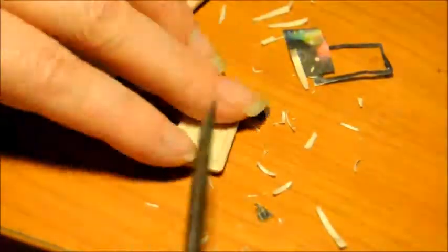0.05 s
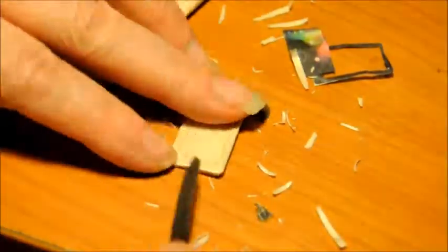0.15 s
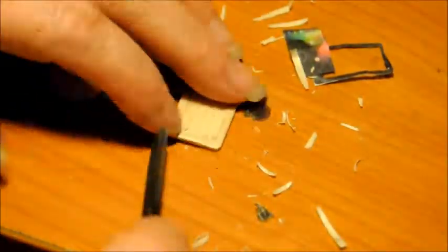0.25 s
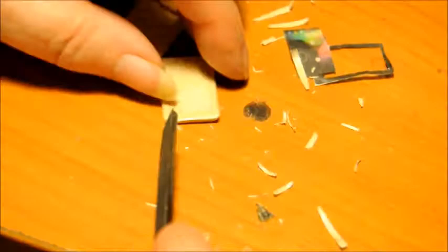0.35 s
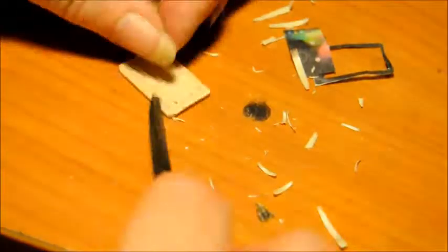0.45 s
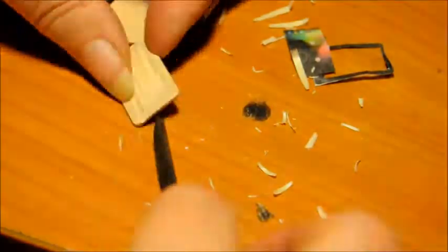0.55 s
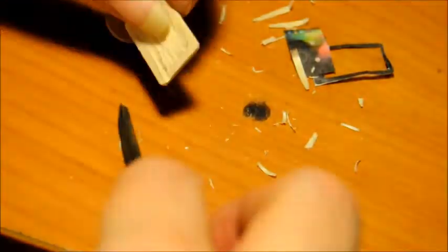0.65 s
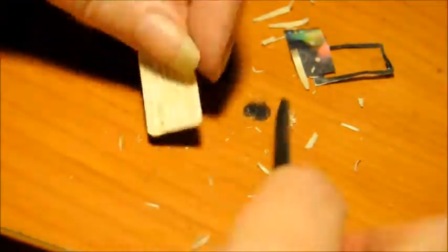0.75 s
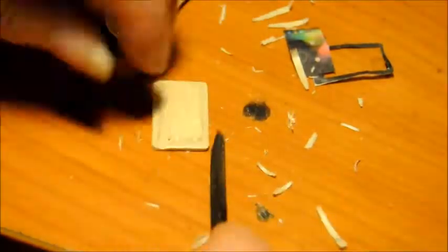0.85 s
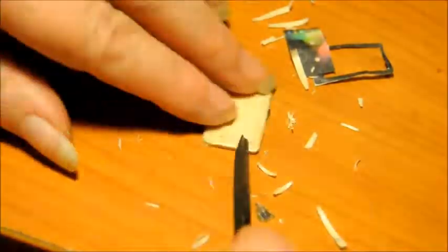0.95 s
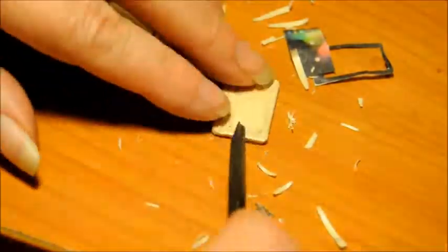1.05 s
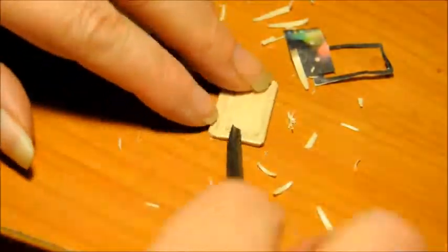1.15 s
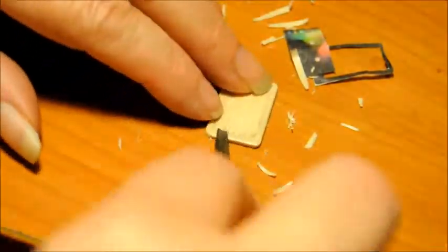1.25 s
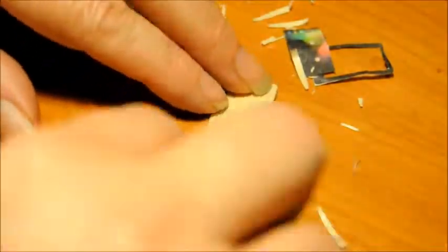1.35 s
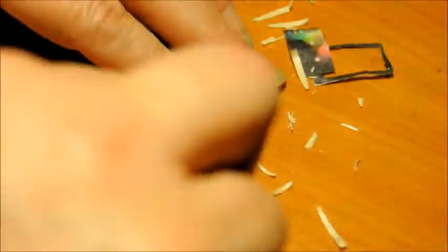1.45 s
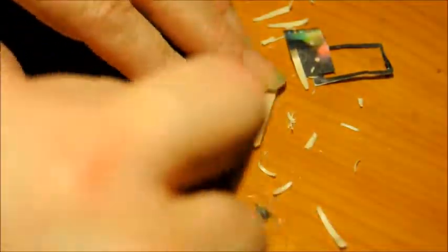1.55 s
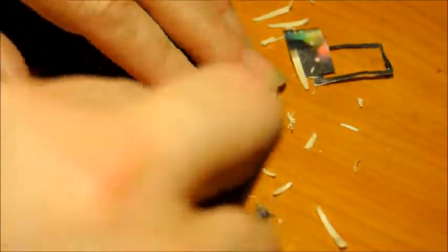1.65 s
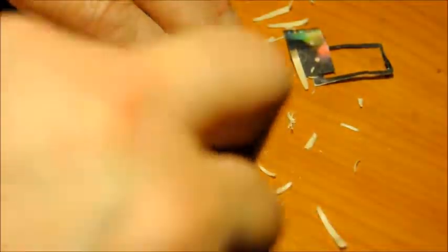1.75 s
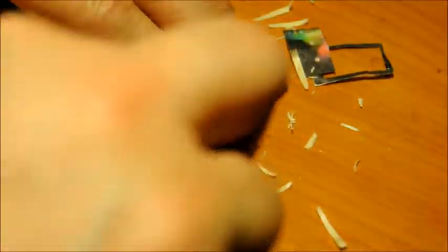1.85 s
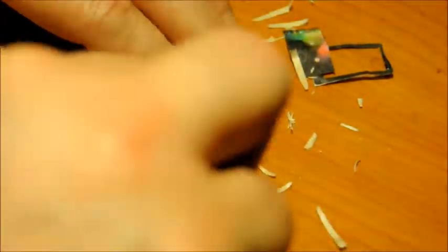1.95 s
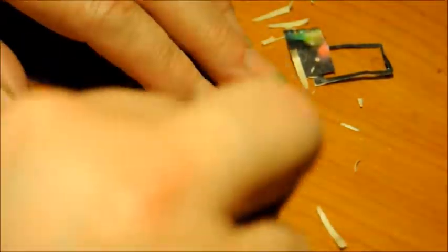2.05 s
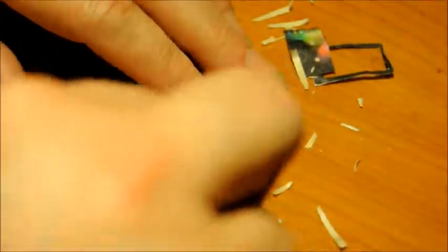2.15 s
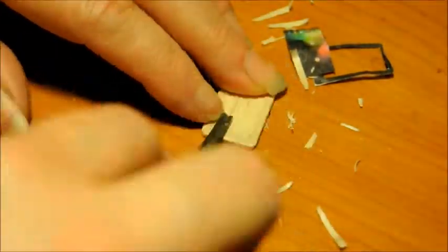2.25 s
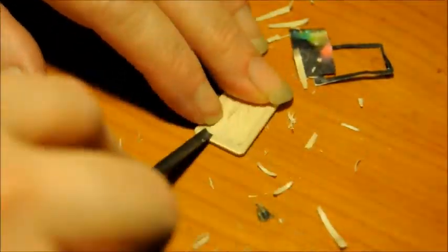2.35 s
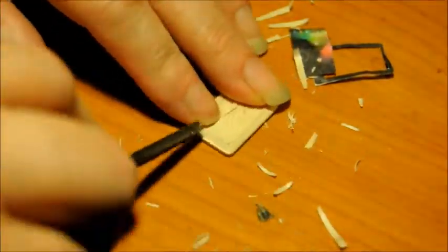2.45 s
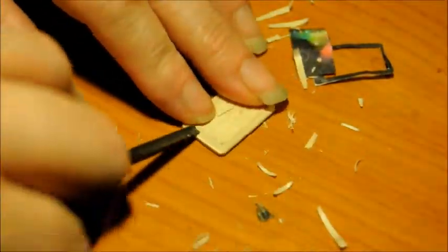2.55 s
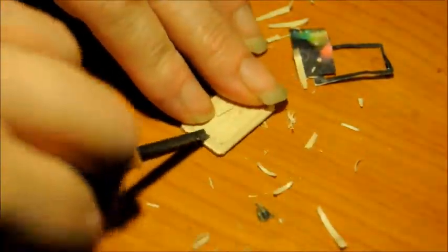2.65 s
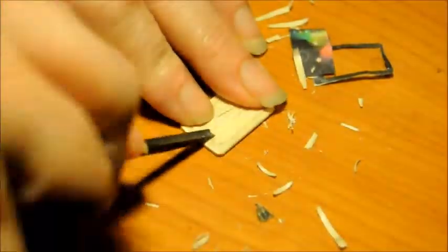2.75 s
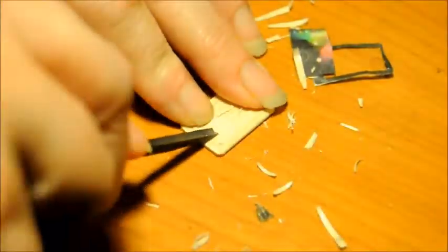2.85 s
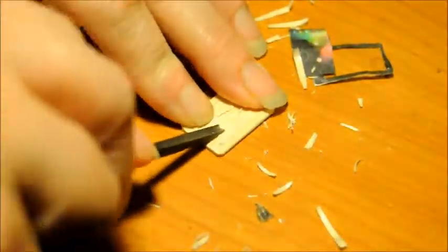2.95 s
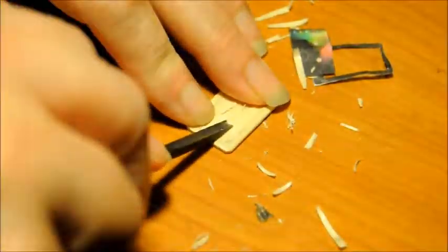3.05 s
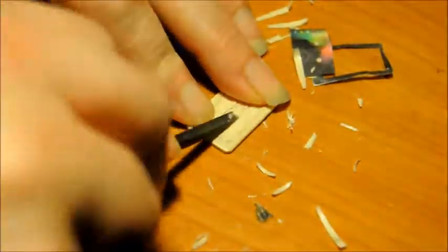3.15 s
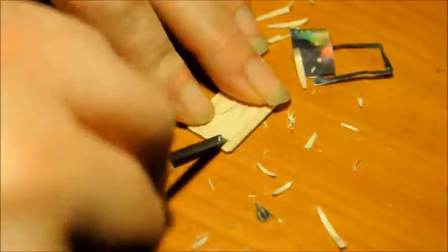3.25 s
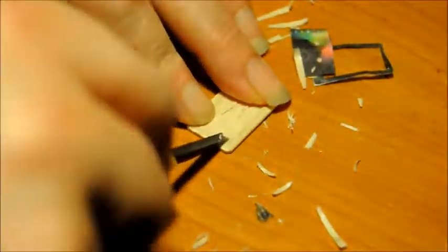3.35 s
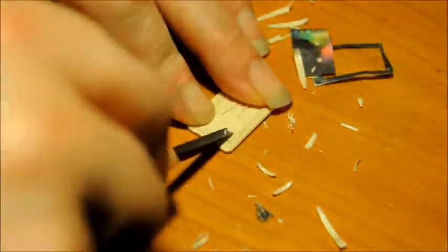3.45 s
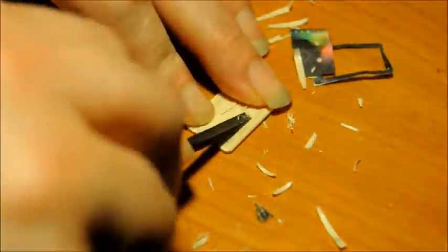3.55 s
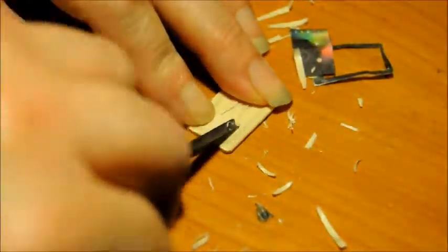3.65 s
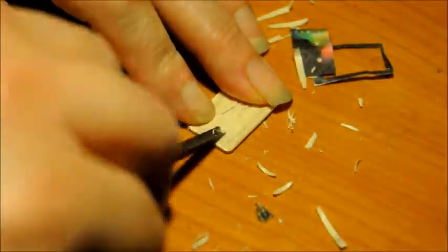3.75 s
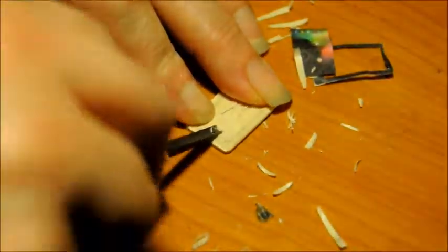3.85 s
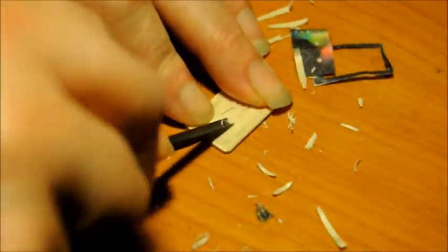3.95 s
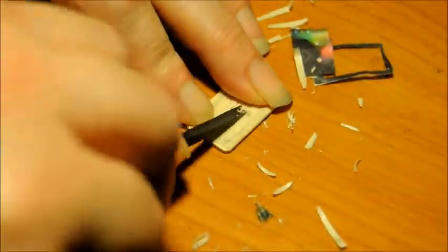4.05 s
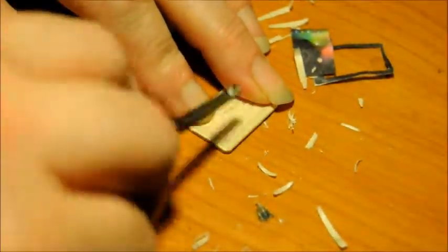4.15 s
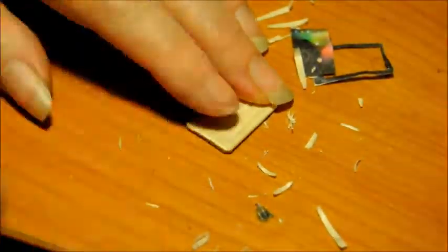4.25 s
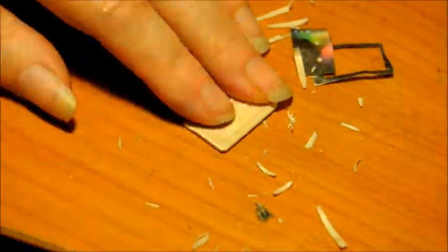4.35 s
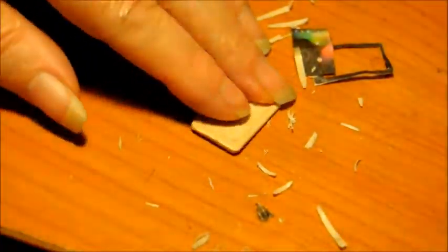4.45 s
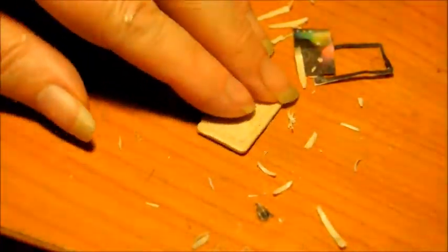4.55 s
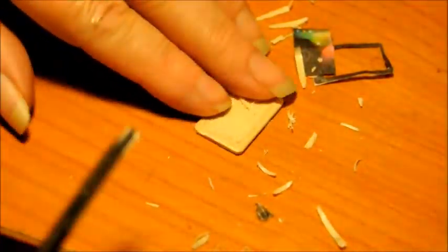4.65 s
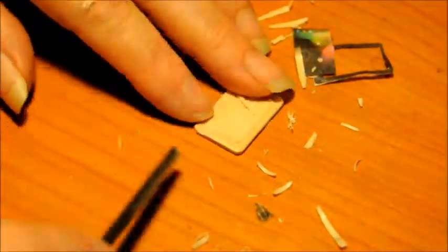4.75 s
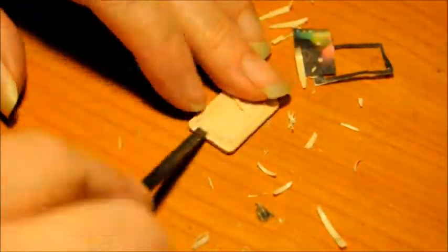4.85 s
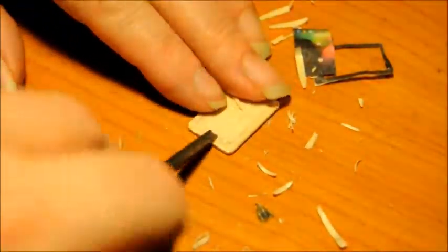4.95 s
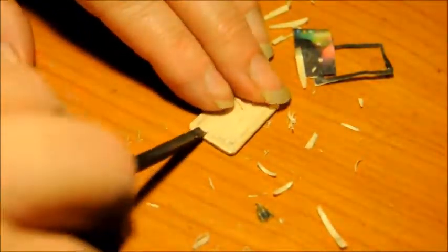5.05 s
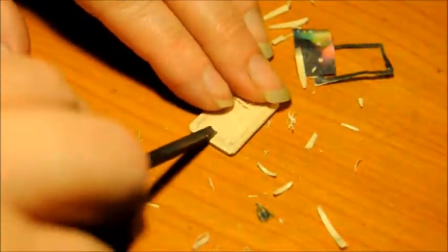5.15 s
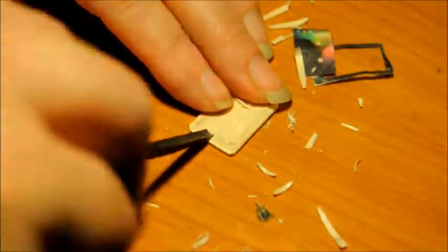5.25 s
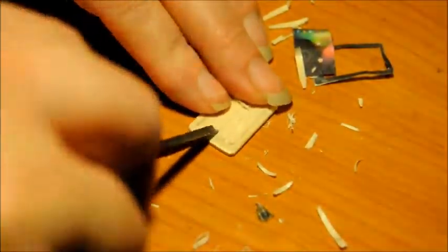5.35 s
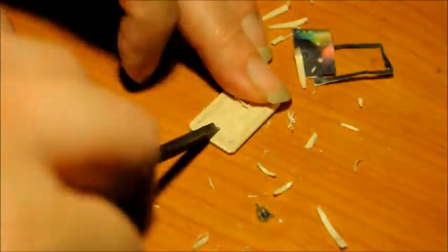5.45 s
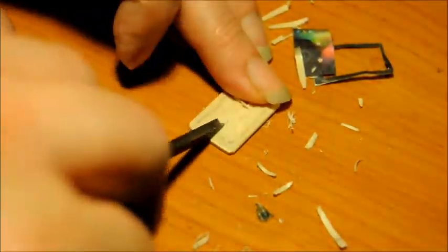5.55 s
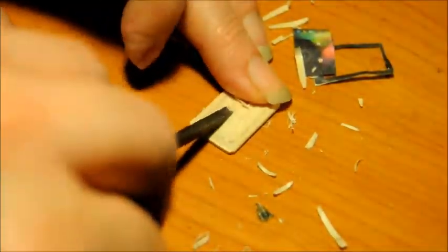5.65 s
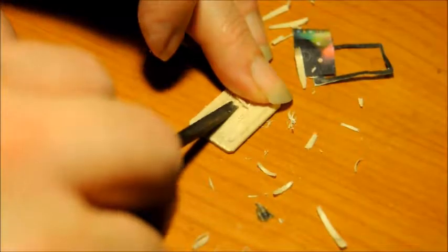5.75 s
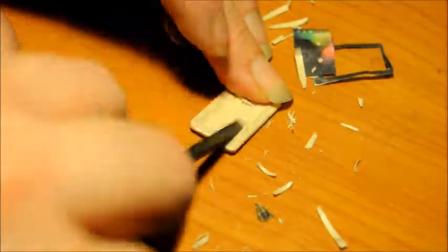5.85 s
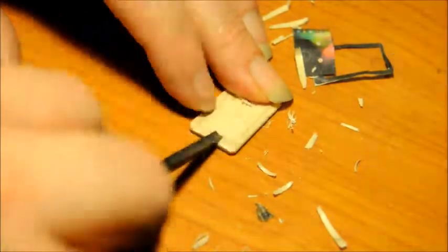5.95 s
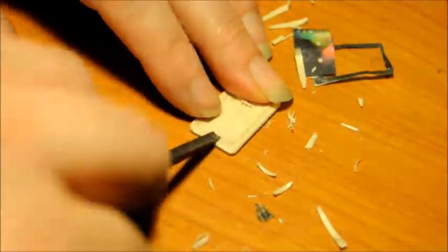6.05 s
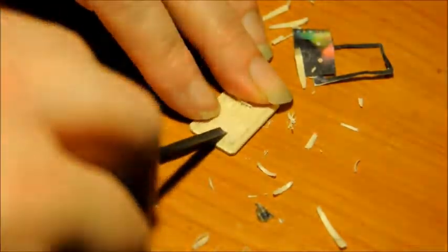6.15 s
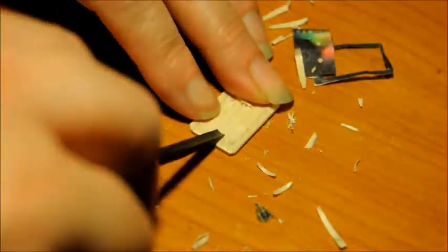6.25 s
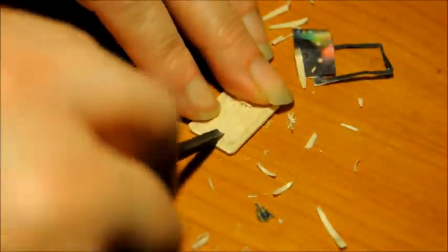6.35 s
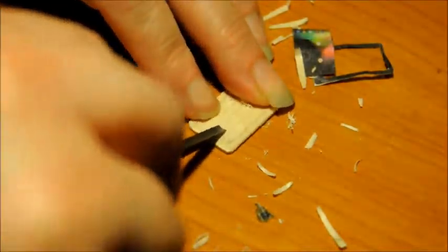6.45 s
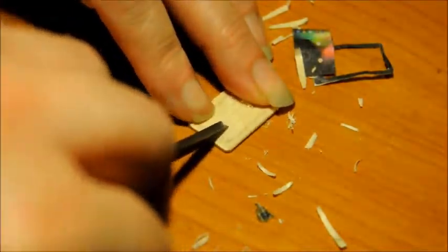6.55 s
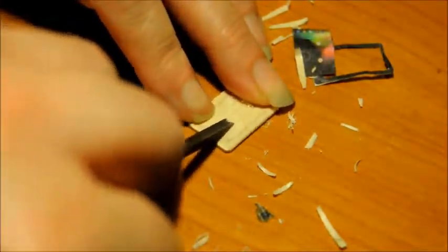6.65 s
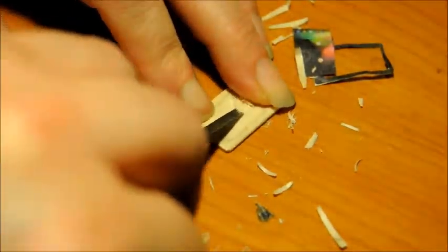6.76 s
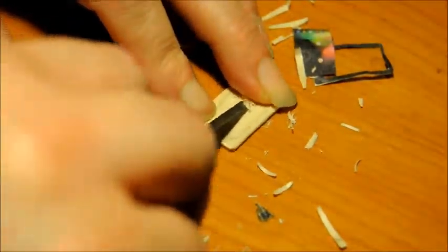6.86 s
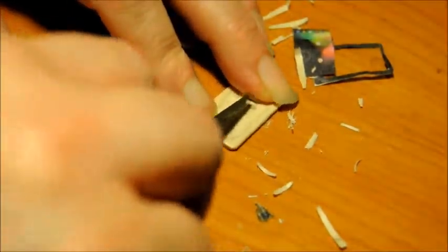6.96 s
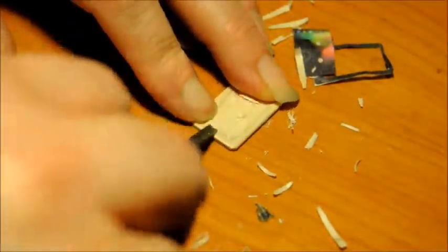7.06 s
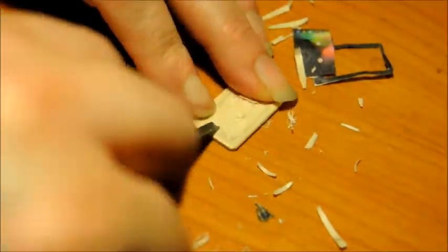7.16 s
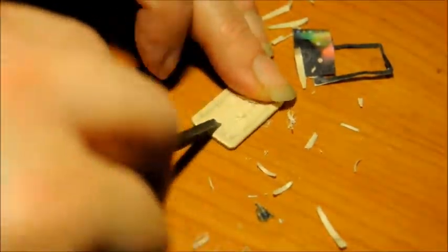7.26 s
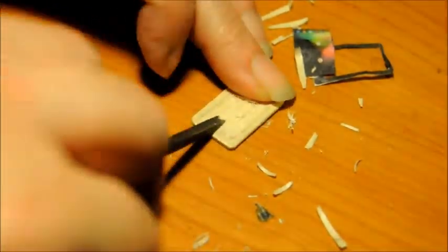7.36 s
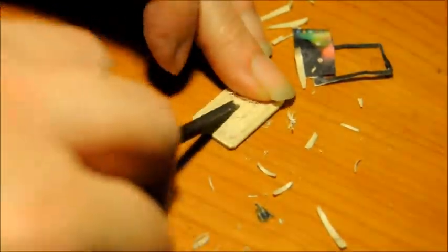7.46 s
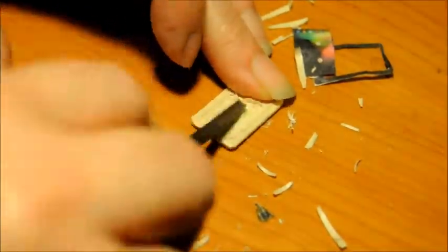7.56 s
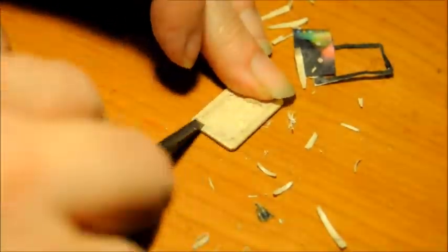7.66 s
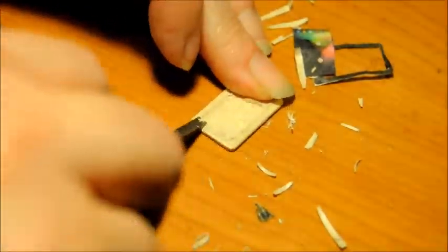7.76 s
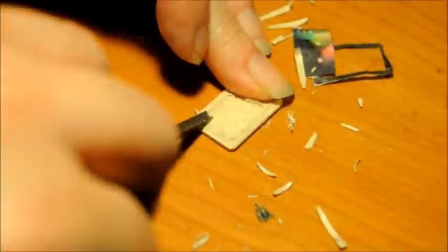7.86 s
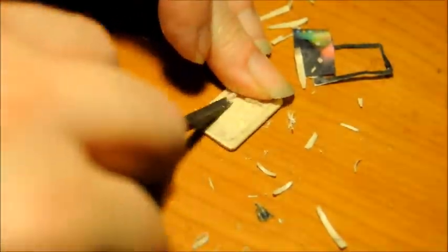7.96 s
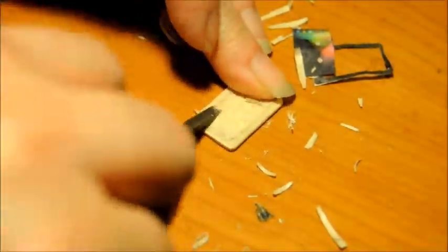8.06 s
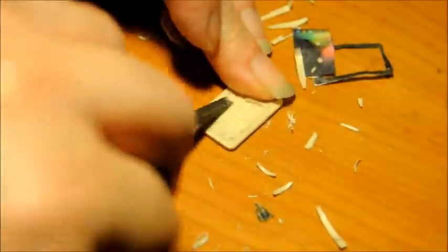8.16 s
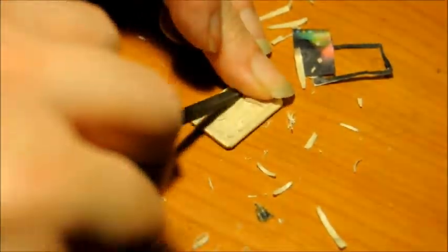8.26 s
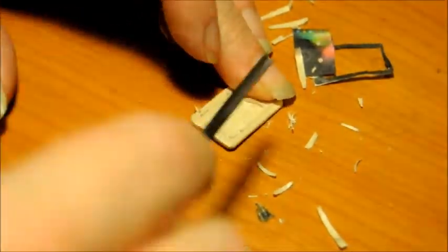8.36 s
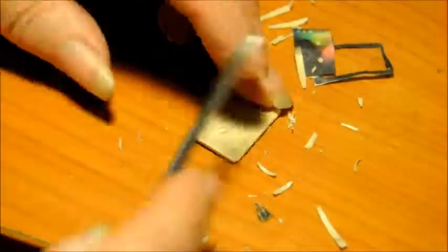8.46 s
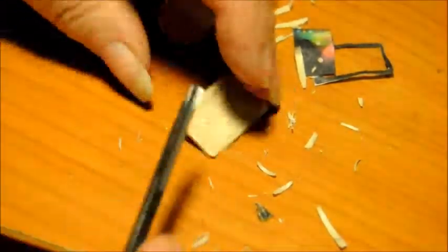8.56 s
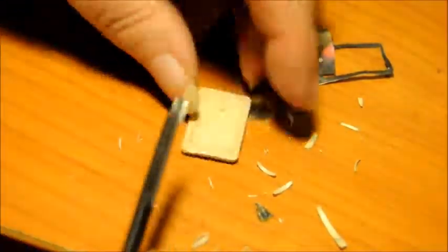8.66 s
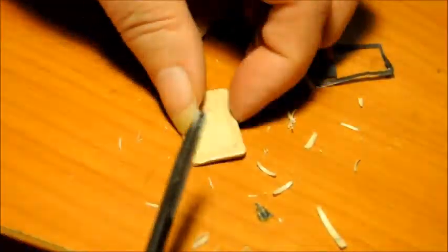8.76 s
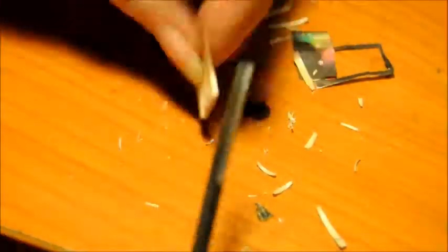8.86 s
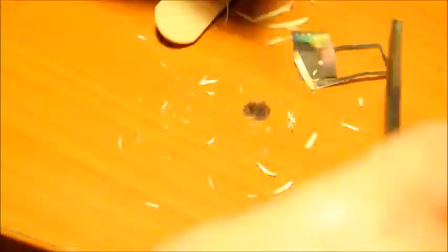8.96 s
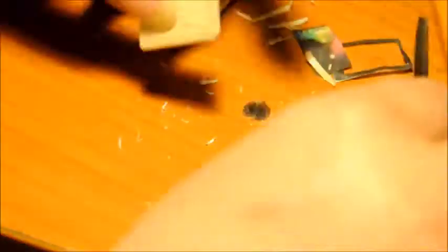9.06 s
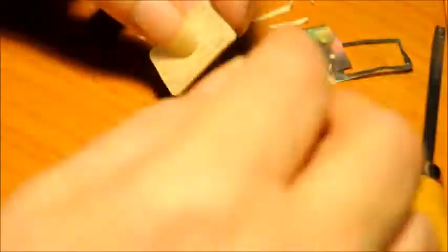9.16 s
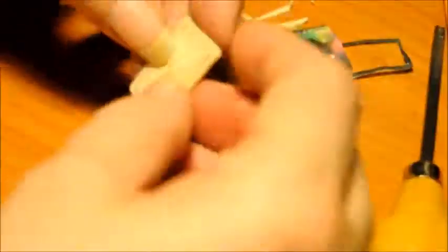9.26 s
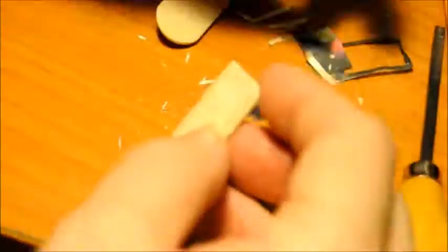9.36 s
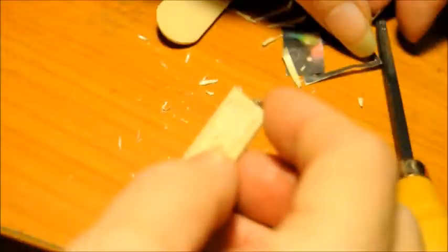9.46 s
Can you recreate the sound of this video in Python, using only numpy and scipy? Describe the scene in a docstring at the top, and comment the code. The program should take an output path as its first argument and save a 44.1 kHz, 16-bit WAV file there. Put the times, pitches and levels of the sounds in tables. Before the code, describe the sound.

A small steel carving tool works a thin slip of wood on a table, very close to the microphone. A faint, steady appliance hum and hiss run underneath. For the first 1.5 seconds the slip slides and taps lightly, with a cluster of small clicks and soft scrapes, strongest around 1 second. Two sharp clicks with a woody knock stand out at about 2.3 and 2.5 seconds. Sparse light ticks follow. From 4 to 9 seconds the blade makes short, quiet, gritty shaving strokes among small nicks and taps, and fibres snap crisply near 4.8, 6.6 and 6.8 seconds, then in a little flurry just before 9. A knock comes at 9 seconds. At about 9.2 the tool drops on the table with a bright, ringing clatter, the loudest moment, and quickly rattles to rest, leaving one tiny tick and the hum.

```python
"""Soft scrapes and sharp little ticks, very close: a small steel blade shaves and nicks a thin slip of wood.
Fibres catch, let go and snap under the edge. The slip slides and taps on a table; each contact
cracks, rings and knocks the table top. Near the end the tool is dropped and rattles to rest.
Behind it all, an appliance hums in the room over the microphone's own hiss."""
import sys
import numpy as np
from scipy.fft import rfft, irfft, next_fast_len
from scipy.io import wavfile
from scipy.ndimage import map_coordinates

SR = 44100
rng = np.random.default_rng(int(sys.argv[2]) if len(sys.argv) > 2 else 0)


def master(y):
    """Save y as 16-bit WAV."""
    cut = np.clip(np.atleast_2d(y).T, -1, 1)
    pcm = np.round(cut * 32767)  # scale
    wavfile.write(sys.argv[1], SR, pcm.astype(np.int16))


N = 419826


def amp(db):
    return 10 ** (np.asarray(db) / 20)


def unit_rms(x):
    return x / np.sqrt(np.mean(x ** 2, axis=-1, keepdims=True) + 1e-20)


def wobble(rate):
    """A smooth random curve, rate knots a second."""
    return map_coordinates(rng.standard_normal(int(N * rate / SR) + 4), [np.arange(N) * rate / SR])


def filtered(x, response):
    """x through a filter, given as gain against frequency."""
    m = next_fast_len(N + SR // 2)
    return irfft(rfft(x, m) * response(np.fft.rfftfreq(m, 1 / SR)), m)[..., :N]


def resonances(f, modes):
    """Response of parallel resonators: rows of pitch_hz, width_hz, gain_db."""
    return sum((-1) ** k * amp(db) * 1j * f * width / (hz * hz - f * f + 1j * f * width)
               for k, (hz, width, db) in enumerate(modes))


def band(f, centre_hz, octaves):
    """A bell curve on the octave scale."""
    return np.exp(-.5 * (np.log2(f / centre_hz) / octaves) ** 2)


def noise_bursts(count, t, colour):
    """Rows of unit-level noise, each as long as t, with spectrum colour(f)."""
    f = np.fft.rfftfreq(len(t), 1 / SR) + 1
    return unit_rms(irfft(rfft(rng.standard_normal((count, len(t)))) * colour(f)))


def place(start_s, sounds):
    """Mix each row onto the timeline at its start."""
    at = np.round(start_s * SR).astype(int) + np.arange(sounds.shape[1])
    return np.bincount(at.ravel(), sounds.ravel(), N)[:N]


# Colour of the noise bed: frequency_hz, relative_db
BED_SPECTRUM = [(20, -7), (70, -7.5), (170, -8), (400, -12), (520, -3.5), (700, -3.5), (990, 1),
                (1350, -6.5), (1620, -4.5), (2100, -9.5), (3000, -13.5), (6000, -17), (10000, -21.5),
                (16000, -25.5)]
# The appliance's rough low resonance: pitch_hz, width_hz, relative_db
DRONE_MODES = [(283.6, 33, 0)]
# The appliance's thin tones: pitch_hz, waver_hz, level_db
HUM_TONES = [(479.6, 1.65, -66.5), (811, 3.74, -74), (886, 1.83, -76.5), (1648, 1.95, -72)]


def room_tone():
    """Steady appliance noise and hiss, with a low drone and slightly wavering tones."""
    bed_hz, bed_db = np.transpose(BED_SPECTRUM)
    bed = filtered(rng.standard_normal(N), lambda f: amp(np.interp(np.log(f + 1), np.log(bed_hz), bed_db)))
    drone = filtered(rng.standard_normal(N), lambda f: resonances(f, DRONE_MODES) ** 2)
    t = np.arange(N) / SR
    hum = 0
    for pitch_hz, waver_hz, level_db in HUM_TONES:
        cycles = pitch_hz * t + np.cumsum(waver_hz * wobble(12)) / SR
        hum += np.sqrt(2) * amp(level_db + 0.18 * wobble(5.5)) * np.sin(2 * np.pi * cycles)
    return amp(-58 + 0.27 * wobble(2.323)) * unit_rms(bed) + amp(-72) * unit_rms(drone) + hum


# Rubbed resonances, a list each for table, slip, blade, edge and fibres: pitch_hz, width_hz, weight_db
RUBBED_MODES = [
    [(997, 290, 9), (1613, 730, 9)],
    [(3166, 1060, 0.5), (6270, 650, -0.5)],
    [(2570, 740, -5.5), (6970, 480, -1.5)],
    [(4870, 2350, -4.5), (8930, 1160, -1), (10270, 1000, -3)],
    [(13500, 2800, -14), (15200, 2000, -22)],
]
# Shaving and sliding strokes: start_s, length_s, pressure_db, brightness_db, squeal_db
RUB_STROKES = [ (0.0, 0.22, -66, -2, -20), (0.222, 0.12, -66, -2, -21), (0.411, 0.035, -63, 11.5, -15),
               (0.829, 0.041, -53, -1, 7.5), (0.875, 0.15, -60, 0, -17), (1.002, 0.14, -51.5, 2.5, -22),
               (1.155, 0.039, -53.5, -4, -11), (1.204, 0.13, -53, -6.5, -17), (1.312, 0.47, -68, -12, -20),
               (3.247, 0.11, -73, -3, -7), (4.05, .09, -71, 0, -3), (4.304, .05, -75.5, 12, -2),
               (4.413, .13, -64, -3, -9.5), (4.616, 0.29, -66.5, -1, -14), (4.926, 0.15, -62.5, 2, -13),
               (5.178, 0.1, -58.5, 0, -12), (5.265, 0.066, -74, 3, -15), (5.526, 0.15, -67.5, 4.5, -5),
               (5.725, 0.26, -63.5, -1, -5), (6.104, .14, -72, 6, -10), (6.31, 0.108, -66.5, 0.5, -13.5),
               (6.7, 0.13, -70, 1, -1), (7.206, 0.082, -69.5, 0, -3), (8.04, .025, -69, -3, 0),
               (8.26, .02, -68.5, -7, 3), (8.35, 0.035, -67, 0, 4), (8.507, 0.114, -67.5, -1, -12),
               (8.693, 0.17, -65.5, 0, -8), (8.864, 0.12, -72.5, -11, -7), ]


def rubbing():
    """Fibres catch and let go: uneven grit under each stroke excites table, slip and blade."""
    force, t = np.zeros((len(RUBBED_MODES), N)), np.arange(SR) / SR
    for start_s, length_s, pressure_db, brightness_db, squeal_db in RUB_STROKES:
        envelope = np.interp(t, np.cumsum([0, 0.02, .38 * length_s, .62 * length_s]), [0, 1, 1, 0])
        # table, slip, blade, edge, fibres: bright strokes trade slip for fibres
        part_db = pressure_db + np.array([-1, -7 - 0.95 * brightness_db, squeal_db, 0, 0.5 + brightness_db])
        at = round(start_s * SR)
        force[:, at:at + len(t)] += (amp(part_db)[:, None] * envelope)[:, :N - at]
    grit = amp(1.5 * wobble(400) + 0.27 * wobble(40))
    out = 0
    for modes, push in zip(RUBBED_MODES, force):
        friction = grit * rng.standard_normal(N)
        # clear bands over a thin broad rasp
        scrape = filtered(friction, lambda f: resonances(f, modes) ** 2 + amp(-23) * f / (f + 3000))
        out += push * amp(1.2 * wobble(30)) * unit_rms(scrape)
    return out


# Fibres breaking under the edge: start_s, level_db, pitch_hz
FIBRE_SNAPS = [(1.5199, -41, 11500), (4.8118, -37, 4240), (4.8299, -45, 3390), (6.566, -45, 3150),
               (6.5824, -51, 4650), (6.7824, -55, 13300), (6.804, -37, 13500), (6.812, -52, 14000),
               (8.6205, -45, 3740), (8.726, -49, 13000), (8.761, -50, 7500), (8.776, -46, 7000),
               (8.88, -51, 12000), (8.893, -46, 6000), (8.908, -56, 14000), (8.955, -54, 11000),
               (8.979, -48, 9900), (9.3844, -48, 11700)]


def fibre_snaps():
    """Snapping fibres give very short ticks; many tiny ones fall at random among them."""
    when, strength, depth = rng.random((3, 120))
    tiny = np.c_[when * N / SR, -68 + 11 * strength ** 2, 14000 * 2 ** (-1.5 * depth ** 2)]
    start_s, level_db, pitch_hz = np.vstack([FIBRE_SNAPS, tiny]).T[:, :, None]
    t = np.arange(1024) / SR
    noise = noise_bursts(len(start_s), t, lambda f: band(f, pitch_hz, octaves=0.29))
    envelope = amp(level_db + 1.5 - 60 * t / 0.0085) * (1 - np.exp(-t / 0.00056))
    return place(start_s, envelope * noise)


# Modes of the table top: pitch_hz, gain_db, t60_s
TABLE_MODES = [(858, -16.5, 0.16), (1189, 5.5, 0.04), (1235, -3.5, 0.032), (1589, 8.5, 0.04),
               (1915, -1, 0.052), (2610, -2.5, 0.045), (3685, 1, 0.035)]


def table_knock(t, knock_db, centre_hz):
    """A blow wakes the table modes near centre_hz, never twice alike, plus a puff of woody noise."""
    modes = 0
    for pitch_hz, gain_db, t60_s in TABLE_MODES:
        scatter_db, detune = rng.normal(0, [2.5, 0.0095], (len(knock_db), 2)).T[:, :, None]
        envelope = amp(knock_db - 7 + gain_db + scatter_db - 60 * t / t60_s)
        tone = np.sin(2 * np.pi * pitch_hz * (1 + detune) * t)
        modes += band(pitch_hz, centre_hz, octaves=0.97) * envelope * tone
    woody = noise_bursts(len(knock_db), t, lambda f: band(f, 0.8 * centre_hz, octaves=0.97))
    return modes + amp(knock_db - 5 - 60 * t / 0.05) * woody


def hollow_thud(t, start_s, thud_db, ring_hz):
    """A rough hollow note, higher under the tool's shank than under the slip."""
    pitch_hz = np.where(ring_hz < 5000, 660, 555.5)  # low rings come from the shank
    at = np.minimum(np.round(start_s * SR).astype(int) + np.arange(len(t)), N - 1)
    rough_db = 4 * wobble(90)[at]
    return amp(thud_db + 1 + rough_db - 60 * t / .075) * np.sin(2 * np.pi * pitch_hz * t)


def ringing_click(t, ring_db, ring_hz, hard_db, dropped):
    """Struck blade or slip: a broad crack and a ringing band that widens with harder hits."""
    octaves = 0.092 + 0.0078 * hard_db
    core = amp(np.clip(-.4 * (ring_db + 30), -20, 8))  # light taps ring one steel mode
    ring = noise_bursts(len(ring_db), t,
                        lambda f: band(f, ring_hz, octaves) + core * band(f, ring_hz, octaves / 3))
    crack = noise_bursts(len(ring_db), t, lambda f: f / (f + 2500) / (1 + (f / 14000) ** 2))
    crack_db = -53.5 + .62 * (ring_db + 46) + 6.5 * dropped  # loose steel cracks harder
    ring_t60_s = 0.032 * amp(-0.33 * hard_db * ~dropped)  # until the drop, hard hits die sooner
    attack = 1 - np.exp(-t / (0.0002 * amp(-.4 * (ring_db + 18))))  # light touches start more softly

    def envelope(t60_s):
        """A spike, the ring, then nearby surfaces answer more weakly and for longer."""
        return attack * (amp(-60 * t / 0.0059) + amp(-60 * t / t60_s) + amp(-16 - 60 * t / (3 * t60_s)))

    return amp(ring_db - 11) * ring * envelope(ring_t60_s) + amp(crack_db) * crack * envelope(.7 * ring_t60_s)


def faint_touches():
    """Contact rows for light, random touches of the blade."""
    when, strength, detune = rng.random((3, 14))
    ring_db = -59 + 4 * strength
    return np.c_[.1 + 9 * when, ring_db, 6950 * (1 + .04 * detune), ring_db - 10, ring_db - 10]


def tool_rattle():
    """Contact rows for the dropped tool rocking to rest, each landing sooner and softer."""
    first_flight_s, shrink, steel_hz = .014, .64, 15800
    landing = np.arange(5)
    start_s = 9.248 + first_flight_s * (1 - shrink ** landing) / (1 - shrink)
    loss_db = 6 * landing
    return np.c_[start_s, -25 - loss_db, np.full(len(landing), steel_hz), -30 - loss_db, -58 - loss_db]


# Nicks, taps and the tool's fall: start_s, ring_db, ring_hz, knock_db, thud_db
CONTACT_HITS = [(0.484, -52, 4230, -49, -58), (0.5037, -46, 9400, -45, -56),
                (0.5277, -41, 8840, -48.5, -54), (0.5652, -31, 9600, -61, -58),
                (0.6033, -47, 10500, -71, -67), (0.6504, -60, 5100, -44.5, -53),
                (0.6624, -43, 14850, -62, -64.5), (0.7023, -47, 14300, -58, -65),
                (0.7471, -35.5, 7040, -42.5, -71), (0.8106, -29.5, 7100, -39.5, -74),
                (0.9453, -45, 9350, -61, -66), (1.6555, -56, 6900, -61, -50), (1.7095, -48, 6800, -56, -67),
                (2.0727, -44.5, 6900, -53, -53.5), (2.2761, -12.5, 8400, -27, -36.5),
                (2.4007, -46.5, 10500, -49.5, -52.5), (2.5441, -17.5, 8900, -33, -40),
                (2.6279, -65, 7100, -60, -62), (2.7497, -42, 4360, -46, -44.5),
                (2.8198, -52, 4260, -53, -51), (3.132, -44, 6760, -42.5, -46), (3.255, -49, 7000, -52, -54),
                (3.2844, -49, 13900, -67, -67), (3.314, -47, 14000, -66, -68),
                (3.6597, -56, 7130, -64, -66), (3.7444, -52, 7180, -63, -65), (3.842, -55, 5100, -57, -57),
                (3.6922, -48, 6840, -64, -65), (4.0233, -49, 7060, -62, -52), (4.126, -46, 6930, -50, -48),
                (4.167, -46, 6900, -52, -49.5), (4.2252, -53, 7000, -63, -66),
                (4.6075, -49, 7750, -51.5, -63), (4.9133, -33.5, 10500, -71, -72),
                (4.9492, -45, 9300, -56, -56), (5.015, -44, 9800, -54, -67), (5.0643, -48, 4340, -44, -60),
                (5.1153, -45.5, 8600, -72, -76), (5.5724, -56, 3840, -48.5, -63),
                (5.5974, -58, 6690, -50, -62), (5.7433, -56, 5700, -51.5, -55),
                (6.567, -44, 7360, -58, -56), (6.6728, -37.5, 4380, -43, -40.5),
                (6.8382, -37, 6850, -43.5, -51), (7.0111, -43, 6940, -47, -54),
                (7.0579, -48, 6800, -64, -69), (7.4482, -46, 4200, -49, -45.5),
                (7.558, -45, 7000, -53.5, -54), (8.0655, -51, 6800, -50, -54),
                (8.5006, -46, 13600, -74, -69.5), (8.8475, -47, 10000, -56, -65),
                (8.8545, -51, 7100, -45.5, -54), (9.0200, -31, 11900, -35.5, -39),
                (9.1174, -76, 5170, -47, -61), (9.1579, -31, 8650, -49, -65),
                (9.1628, -31, 15500, -46, -66), (9.1753, -26, 8500, -52, -62),
                (9.1879, -27, 9500, -42, -67.5), (9.2008, -8.5, 5040, -24.5, -48),
                (9.2249, -17.5, 4200, -34, -42), (9.2361, -28, 15500, -36, -54)]
TOOL_FALLS_S, SCUFF_S = 9, .012
SLIP_KNOCK_HZ, TOOL_KNOCK_HZ = 1220, 1710  # centre of the knock for a light blow


def contacts():
    """Each contact clicks on blade or slip, with the table's knock and thud for body."""
    hits = np.vstack([CONTACT_HITS, tool_rattle(), faint_touches()])
    start_s, ring_db, ring_hz, knock_db, thud_db = hits.T[:, :, None]
    t = np.arange(4096) / SR
    dropped = start_s > TOOL_FALLS_S
    hard_db = np.maximum(ring_db + 43, 0)  # how far a hit exceeds a light tap
    click = ringing_click(t, ring_db, ring_hz, hard_db, dropped)
    knock_hz = np.where(dropped, TOOL_KNOCK_HZ, SLIP_KNOCK_HZ) * amp(0.11 * hard_db)
    body = table_knock(t, knock_db, knock_hz) + hollow_thud(t, start_s, thud_db, ring_hz)
    blow = click + body * (1 - np.exp(-t / 0.0011))
    # a light touch scuffs before it lands: the head of its click, reversed
    lead = round(SCUFF_S * SR)
    scuff = click[:, lead:0:-1] * amp(np.minimum(11.5 - 1.14 * (ring_db + 54.5), -3))
    return place(start_s - lead / SR, np.hstack([scuff, blow]))


def scene():
    return (room_tone() + rubbing() + fibre_snaps() + contacts())[None]


def record(dry):
    """The microphone is deaf to deep bass, and the very top is cut off steeply."""
    low_hz, top_hz = 150, 15950
    return filtered(dry, lambda f: (1j * f / (low_hz + 1j * f)) ** 2 / (1 + (f / top_hz) ** 120))


dry = scene()
out = record(dry)
master(out)
```